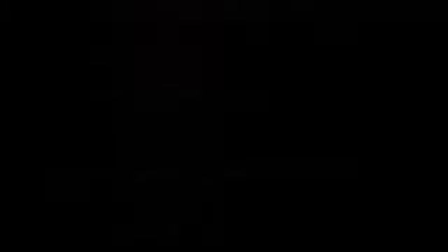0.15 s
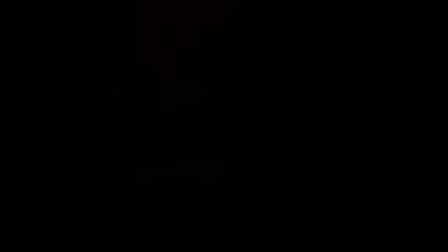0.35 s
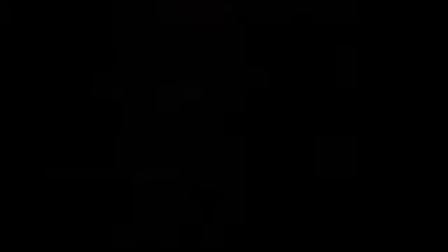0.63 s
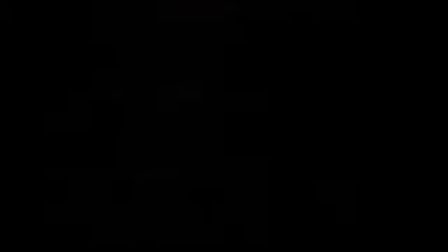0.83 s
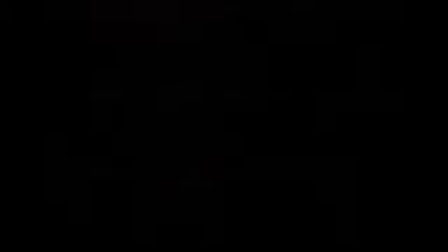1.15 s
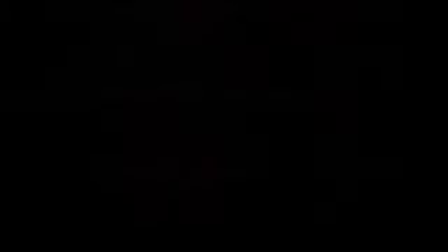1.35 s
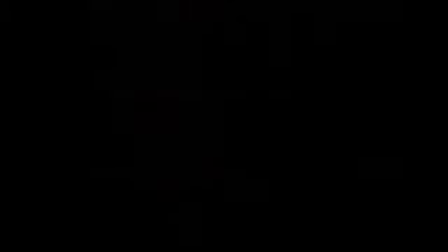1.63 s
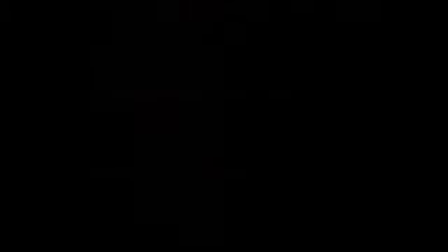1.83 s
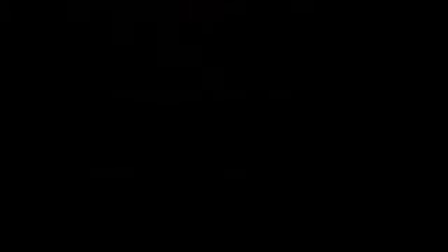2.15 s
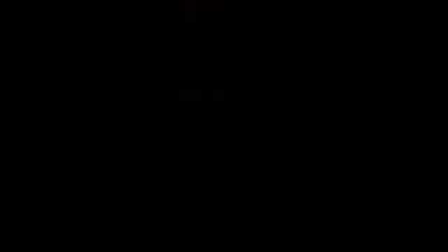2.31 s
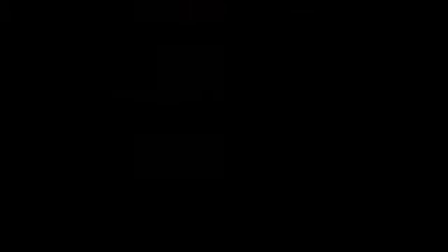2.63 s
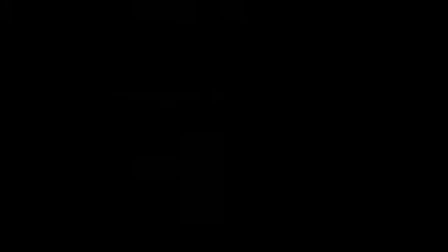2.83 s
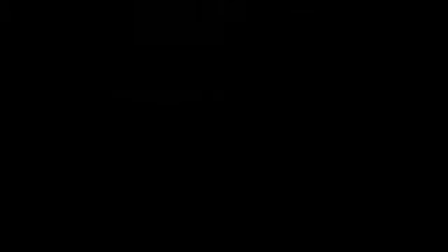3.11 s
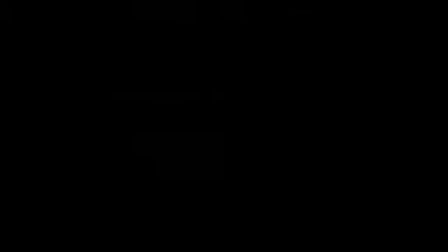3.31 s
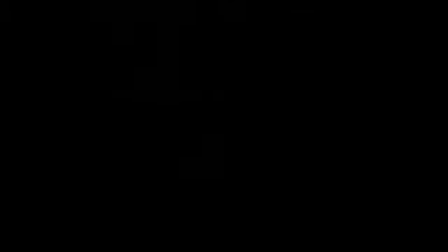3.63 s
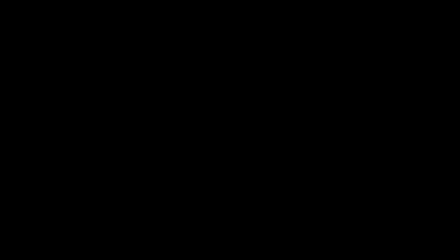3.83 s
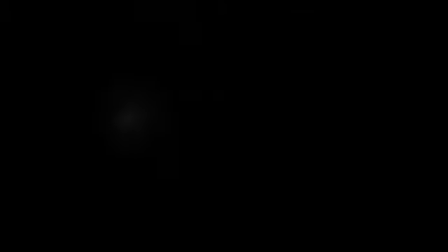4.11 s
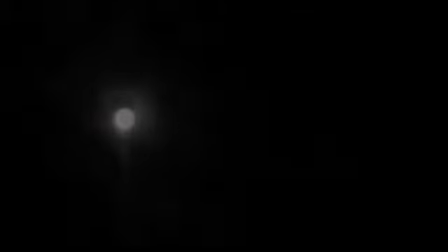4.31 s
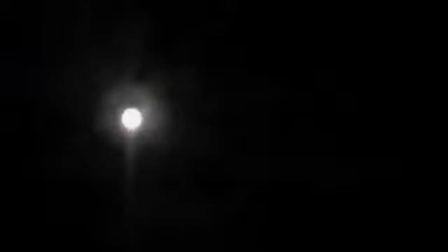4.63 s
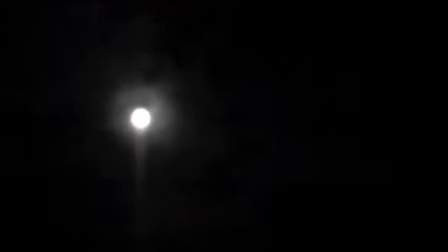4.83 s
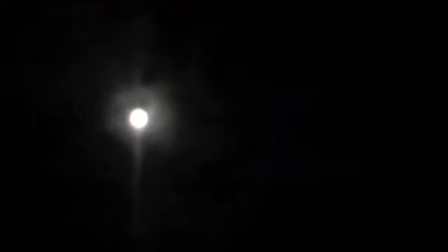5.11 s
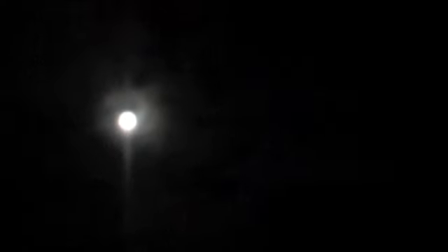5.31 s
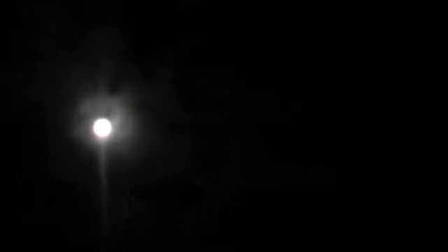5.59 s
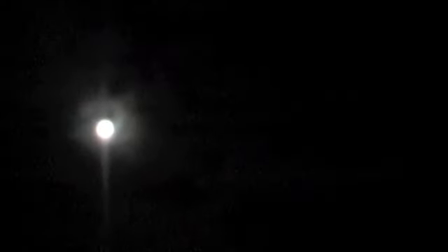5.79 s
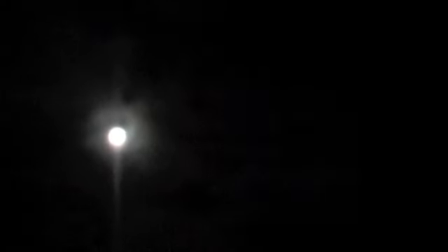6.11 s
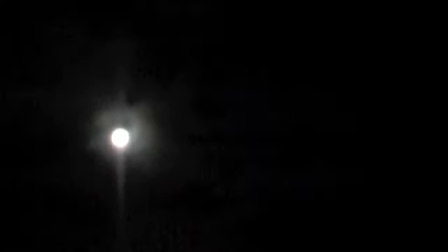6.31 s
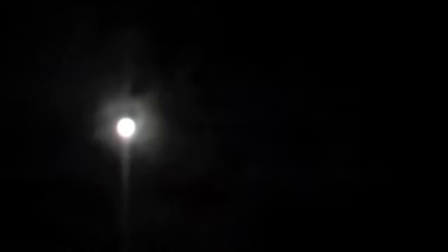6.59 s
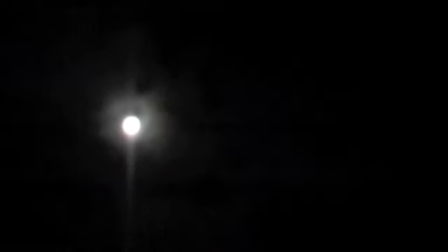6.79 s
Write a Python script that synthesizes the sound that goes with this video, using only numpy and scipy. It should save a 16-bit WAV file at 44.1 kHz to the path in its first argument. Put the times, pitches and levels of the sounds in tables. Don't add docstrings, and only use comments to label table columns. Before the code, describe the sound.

One owl gives repeated short, sharp rising shrieks in a quiet night garden while a second owl adds one long wavering, echoing hoot.

```python
import sys
import numpy as np
from scipy import signal
from scipy.io import wavfile
from scipy.ndimage import uniform_filter1d

SR = 44100
rng = np.random.default_rng(int(sys.argv[2]) if len(sys.argv) > 2 else 0)


def wav_out(sig):
    wavfile.write(sys.argv[1], SR, np.round(np.clip(np.atleast_2d(sig).T, -1, 1) * 32767).astype(np.int16))


def level_to_linear(level):
    exponent = np.asarray(level, float) / 20
    return 10 ** exponent


N = 306495

# frequency_hz, t60_s
FAR_DECAY = [(900, 9.0), (1500, 3.0), (4000, 1.2), (10000, .5)]


def read(points, hz):
    f, value = np.transpose(points)
    return np.interp(np.log(hz + 1), np.log(f + 1), value)


def evened(x):
    return x / np.sqrt(np.mean(abs(x) ** 2) + 1e-20)


def add(mix, start, sound):
    mix[..., start:start + sound.shape[-1]] += sound


def wander(size, width_hz):
    r = np.exp(-np.pi * width_hz / SR)
    z = rng.standard_normal(size) + 1j * rng.standard_normal(size)
    once = signal.lfilter([1 - r], [1, -r], z)
    return evened(signal.lfilter([1 - r], [1, -r], once))


def echoes(x, decays, seconds, onset, shared, lumpy_db=0):
    common, left, right = rng.standard_normal((3, round(seconds * SR)))
    taps = shared * common + np.sqrt(1 - min(shared, 1) ** 2) * np.array([left, right])
    hz, t, z = signal.stft(taps, SR, nperseg=256)
    decay_db = -60 * t / read(decays, hz)[:, None]
    tail = signal.istft(z * level_to_linear(decay_db), SR, nperseg=256)[1]
    tail *= np.clip(np.arange(tail.shape[1]) / SR / onset, 0, 1)
    if lumpy_db:
        tail *= level_to_linear(lumpy_db * wander(tail.shape[1], 90).real)
    return signal.fftconvolve(x[None], tail / np.linalg.norm(tail[0]), axes=1)[:, :N]


def night():
    # frequency_hz, density_db
    floor = [(15, -56.5), (25, -8), (49, -19.5), (79, -11), (116, -7), (152, -11.5), (227, -4.5), (274, -7),
             (378, -2), (684, 1.5), (919, 1.5), (1900, -6.5), (3930, -20.5), (9050, -19.5), (15500, -23)]
    # frequency_hz, correlation
    likeness = [(60, -.15), (130, -.1), (290, .3), (640, .2), (1400, -.25), (3100, .1), (6800, .25),
                (11000, .05), (15000, .05)]
    # frequency_hz, difference_db
    balance = [(60, 1), (180, 1.1), (550, 4), (1650, -3), (4970, 0.7), (15000, -1.2)]
    traffic_db, traffic_db_per_s = -57.5, -0.4026
    hiss_db, hiss_db_per_s = -2, 0.38
    hiss_early_db, hiss_settle_s = 3.5, 1.5
    lull_s, lull_width_s, lull_depth_db = 1.9, 0.5, -3

    count, hz = N // 256 + 5, np.fft.rfftfreq(1024, 1 / SR)
    a, b, c, d, patches = rng.standard_normal((count, 513, 5)).T
    patches = evened(uniform_filter1d(uniform_filter1d(patches, 12, 0), 16, 1))
    flicker_db = evened(uniform_filter1d(rng.standard_normal(count), 4))
    t = np.arange(count) * 256 / SR
    high = (1 / (1 + (4000 / (hz + 1)) ** 4))[:, None]
    lull_db = lull_depth_db * np.exp(-((t - lull_s) / lull_width_s) ** 2)
    early_db = hiss_early_db * np.exp(-t / hiss_settle_s)
    hiss_level_db = hiss_db + hiss_db_per_s * t + early_db + flicker_db
    level_db = traffic_db + traffic_db_per_s * t + (1 - high) * lull_db + high * hiss_level_db

    same = np.clip(read(likeness, hz), -1, 1)[:, None]
    left = a + 1j * b
    right = same * left + np.sqrt(1 - same ** 2) * (c + 1j * d)
    half_db = read(balance, hz)[:, None] / 2
    sides_db = np.array([half_db, -half_db])
    gain_db = read(floor, hz)[:, None] + sides_db + level_db + 0.8 * patches - 5
    z = np.array([left, right]) * level_to_linear(gain_db)
    return signal.istft(z, nperseg=1024, noverlap=768)[1][:, :N]


def tones():
    # frequency_hz, level_db, bandwidth_hz
    hum = [(52, -76, 3.8), (93, -74, 2.5), (2590, -69.5, 10), (8930, -73, 51)]
    # start_s, length_s, pitch_hz, level_db
    drone = [
        (0.247, .5, 122.3, -71),
        (.72, 0.33, 126.5, -66),
        (1.143, 0.67, 125.9, -71),
    ]
    t = np.arange(N) / SR
    mix = np.zeros((2, N))
    for hz, db, width_hz in hum:
        for side in range(2):
            drift = np.repeat(wander(N // 16 + 1, width_hz * 16), 16)[:N]
            mix[side] += level_to_linear(db) * (drift * np.exp(2j * np.pi * hz * t)).real
    for start_s, length_s, hz, db in drone:
        swell = np.sin(np.pi * np.clip((t - start_s) / length_s, 0, 1)) ** 0.36
        mix += level_to_linear(db + np.array([[4.0], [1.5]])) * swell * np.sin(2 * np.pi * hz * t)
    return mix


def ticks():
    # start_s, level_db, pitch_hz
    clicks = [
        (.602, -54, 12000),
        (.958, -56, 13400),
        (4.622, -36, 3500),
        (5.637, -44, 2460),
        (5.663, -43, 2005),
    ]
    out, t = np.zeros(N), np.arange(200) / SR
    for start_s, db, hz in clicks:
        ring = np.sin(2 * np.pi * hz * t) * np.exp(-t * hz / 1.64)
        add(out, round(start_s * SR), level_to_linear(db) * ring)
    return out


def shriek(top_s, top_hz, effort_db, hold, away_db, rough, fading):
    folds = [-7, -1, -1.5, -4]
    # frequency_hz, level_db
    beak = [(800, 0), (1150, -1.5), (1500, -12), (2350, -2.5), (2850, -2.5), (3400, 2), (4200, -6.5),
            (5200, -0.2)]
    # frequency_hz, level_db
    throat = [(3000, -5), (4700, -3.5), (6000, -14), (8000, -20.5), (11000, -25.5), (14000, -48.5)]
    lead_s, sweep_s, creep_hz_per_s, bend = 0.092, 0.065, 1800, 1.5
    knee_hz = 900 + 0.5 * (top_hz - 1100)
    sag, sag_s, sag_bend = 0.14, 0.044, 1.3
    swell_db_per_s, late_db_per_s = 170, 53
    full_s, close_db = 0.016, 9.5

    t = np.arange(-lead_s, hold, 1 / SR)
    fade = np.sin(np.pi / 2 * np.clip(np.minimum(t + lead_s, hold - t) / 0.0021, 0, 1)) ** 2
    held = np.maximum(t, 0) / hold
    sweep = (top_hz - knee_hz) * np.clip(1 + t / sweep_s, 0, 1) ** bend
    rising = knee_hz + creep_hz_per_s * np.minimum(t, 0) + sweep
    sagging = 1 - sag * hold / (hold + sag_s) * held ** sag_bend
    hz = uniform_filter1d(rising * sagging, size=300)
    hz = hz * (1 + .011 * wander(len(t), 45).real + .002 * wander(len(t), 300).real)
    turn = 2 * np.pi * np.cumsum(hz) / SR
    early = np.minimum(t + full_s, 0)
    strain = rough * (.4 + (hz / hz.max()) ** 8)
    stack = 0
    for k in range(1, 14):
        if k <= 4:
            colour_db = folds[k - 1] + read(beak, k * hz)
        else:
            colour_db = read(throat, k * hz) - 4
        swell_db = (swell_db_per_s + late_db_per_s * k) * early
        turned_db = away_db * max(1.5 - k / 2, -.12)
        closing_db = close_db * min(abs(k - 2), 3) * held ** 1.3
        db = effort_db + swell_db + colour_db + turned_db - closing_db
        slow = fading * np.sqrt(k) * wander(len(t), 69)
        fast = strain * np.sqrt(k) * wander(len(t), 270)
        carrier = np.exp(1j * (k * turn + 2 * np.pi * rng.random()))
        stack = stack + level_to_linear(db) * ((1 + slow + fast) * carrier).real
    return round((top_s - lead_s) * SR), fade * stack


def shrieks():
    # top_s, top_hz, effort_db, hold_s, first_partial_db (as the bird turns away)
    calls = [
        (1.105, 1159, -34.5, 0.031, -0.3),
        (1.54, 1225, -33, 0.013, -1.5),
        (1.929, 1312, -36, 0.007, 0),
        (2.516, 1090, -43.5, 0.048, 2),
        (3.379, 1188, -41, 0.052, -1),
        (3.619, 1071, -54.5, .11, 6.5),
        (4.172, 1145, -39, 0.053, 2.3),
        (4.622, 1081, -53.5, 0.011, 10.5),
        (5.014, 1294, -45.5, 0.0098, 8.5),
        (5.408, 1383, -44, 0.0055, 8.5),
    ]
    # delay_s, left_db, right_db
    reflections = [(.0016, -9, -10), (.0062, -9, -8), (.013, -11, -12), (.021, -13, -12)]
    # frequency_hz, t60_s
    tree_decay = [(1000, 0.45), (2500, 0.37), (4000, 0.27), (10000, 0.37)]
    voice, bounces = np.zeros(N), np.zeros((2, SR // 10))
    for call in calls:
        add(voice, *shriek(*call, rough=.26, fading=.2))
    bounces[:, 0] = 1
    for delay_s, *levels_db in reflections:
        bounces[:, round(delay_s * SR)] = level_to_linear(levels_db)
    near = signal.oaconvolve(level_to_linear(0.5) * voice[None], bounces, axes=1)[:, :N]
    trees = echoes(voice, tree_decay, seconds=1, onset=.025, shared=.8, lumpy_db=3)
    far = echoes(voice, FAR_DECAY, seconds=1.7, onset=0.31, shared=0.16)
    return near + trees + level_to_linear(-30.5) * far


def hoot():
    # time_s, pitch_hz, level_db
    glide = [
        (2.636, 738, -23.5),
        (2.68, 845, -21.5),
        (2.765, 754.2, -20.5),
        (2.95, 828.2, -17),
        (3.06, 878.7, -15),
        (3.22, 868.7, -15),
        (3.38, 792, -17.5),
        (3.45, 733.5, -25.5),
        (3.55, 613, -43.5),
    ]
    # rest_db (against the tone), above_db_per_100hz, below_db_per_100hz, fading_share
    overtones = [(-39, 12.5, 5.7, 0.48), (-49, 15.5, 1.5, 0.42), (-72, 28.5, 5, .5)]
    # time_s, width_s, left_share_lost, right_share_lost
    nulls = [(2.691, 0.011, 0.34, 0.64), (2.718, 0.019, -.3, -0.55), (2.736, 0.0068, 0.6, 0.36),
             (2.84, 0.022, 0.21, 0.072), (2.899, .03, -.2, 0.01), (2.959, 0.014, 0.8, 0.68),
             (3.0, 0.0065, -.3, -0.72), (3.017, 0.0081, 0.87, 0.39), (3.17, 0.023, 0.98, 0.32),
             (3.304, 0.0088, 0.83, 0.27), (3.343, 0.0057, .5, 0.35), (3.359, 0.011, -.9, -.5),
             (3.371, 0.0068, 0.8, 0.35), (3.463, 0.013, 0.72, .7), (3.507, 0.0027, .7, 0.49)]
    # frequency_hz, t60_s
    garden_decay = [(600, 0.78), (1500, 0.88), (4000, 0.94), (10000, 0.48)]
    rest_hz, top_db, lean_db, rise_s = 815, -16, 3, 0.035

    start_s, path_hz, path_db = np.transpose(glide)
    t = np.arange(start_s[0], start_s[-1], 1 / SR)
    start = round(start_s[0] * SR)
    hz, db = np.interp(t, start_s, path_hz), np.interp(t, start_s, path_db)
    hz = uniform_filter1d(uniform_filter1d(hz, size=900), size=900)
    ends_s = np.minimum(t - start_s[0], start_s[-1] - t)
    fade = np.sin(np.pi / 2 * np.clip(ends_s / 0.0029, 0, 1)) ** 2
    fade = fade * np.sin(np.pi / 2 * np.minimum((t - t[0]) / rise_s, 1)) ** 2
    turn = 2 * np.pi * np.cumsum(hz) / SR

    upper = 0
    for k, (rest_db, up_db, down_db, share) in enumerate(overtones, start=2):
        bright_db = np.maximum(up_db * (hz - rest_hz), down_db * (rest_hz - hz)) / 100
        upper_db = top_db + rest_db + bright_db + share * (db - top_db)
        flutter = abs(1 + 0.28 * wander(len(t), 30))
        upper = upper + level_to_linear(upper_db) * flutter * np.sin(k * turn)

    tone = level_to_linear(db) * np.sin(turn)
    sides = np.sin(turn + np.array([[-.4], [.4]]))
    sides = sides * level_to_linear([db + lean_db / 2, db - lean_db / 2])
    voice, near, kept = np.zeros(N), np.zeros((2, N)), np.ones((2, N))
    add(voice, start, np.sqrt(2) * fade * (tone + upper))
    add(near, start, np.sqrt(2) * fade * (sides + upper))
    for at_s, width_s, *lost in nulls:
        dip = np.exp(-((t - at_s) / width_s) ** 2)
        add(kept, start, -np.clip(lost, -1, 1)[:, None] * dip)
    garden = level_to_linear(-8.5) * echoes(voice, garden_decay, seconds=1.0, onset=0.0087, shared=0.062, lumpy_db=4.5)
    far = echoes(voice, FAR_DECAY, seconds=4, onset=1.1, shared=.2)
    return kept * (near + garden) + level_to_linear(-45) * far


def scene():
    return night() + tones() + ticks() + shrieks() + hoot()


def low_pass(x):
    return signal.sosfilt(signal.butter(12, 15920, fs=SR, output="sos"), x)


def record(dry):
    lowpass = signal.firwin(511, 15755, window=("kaiser", 9), fs=SR)
    limited = signal.oaconvolve(dry, lowpass[None], "same")
    return low_pass(limited)


dry = scene()
out = record(dry)
wav_out(out)
```